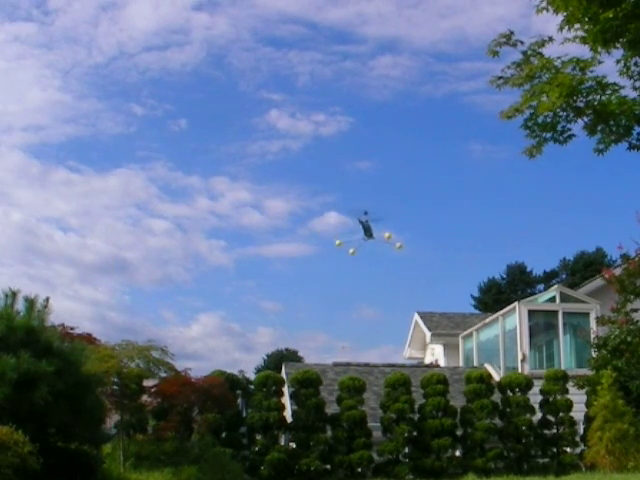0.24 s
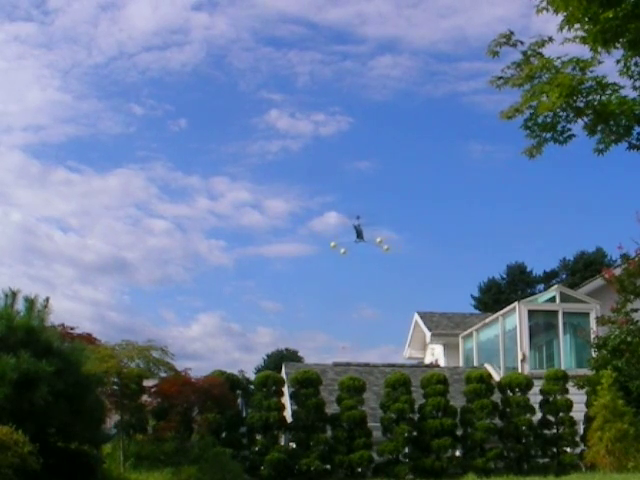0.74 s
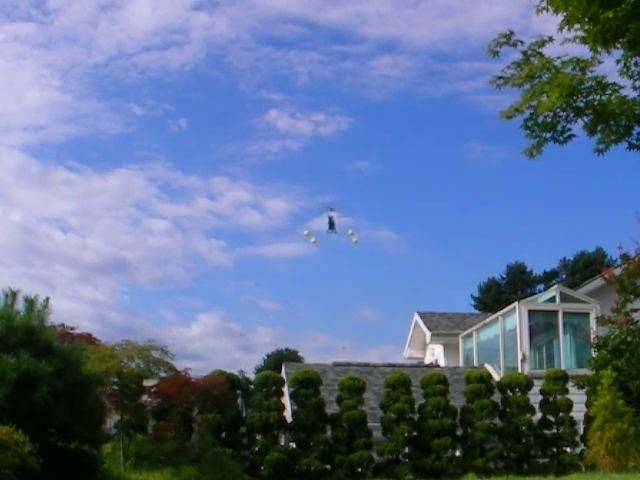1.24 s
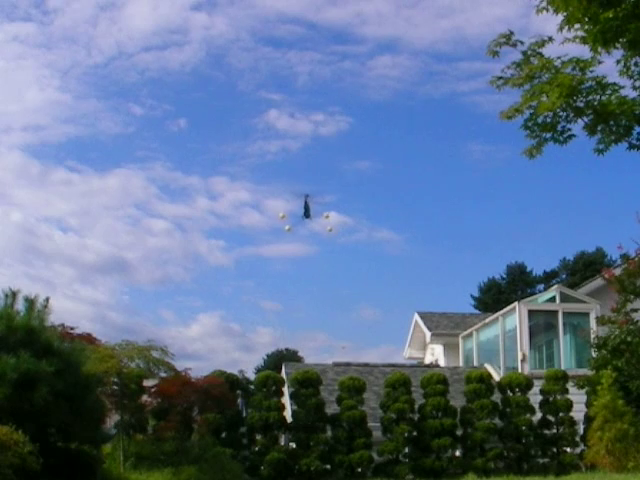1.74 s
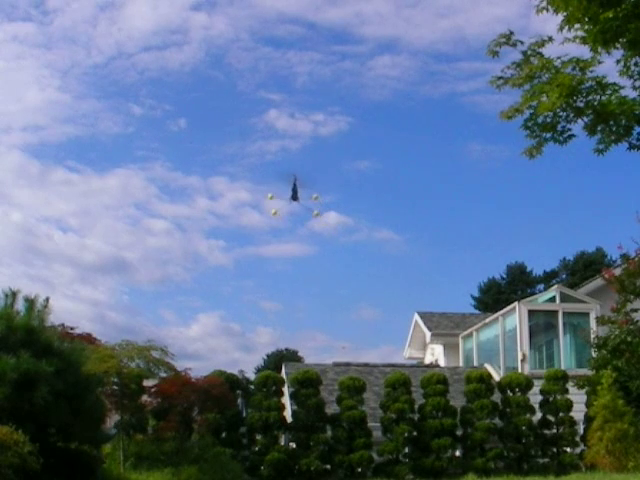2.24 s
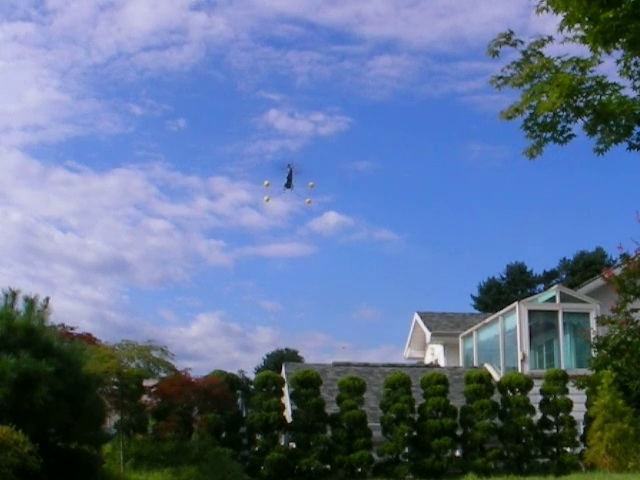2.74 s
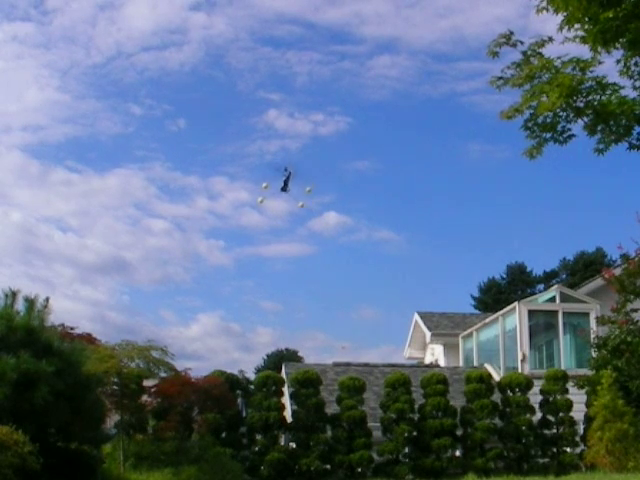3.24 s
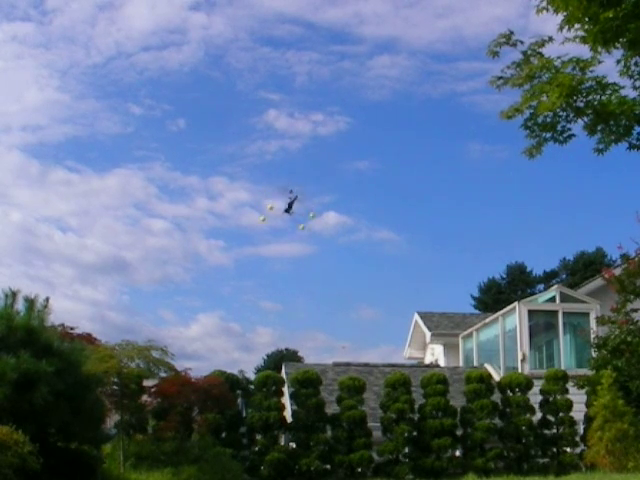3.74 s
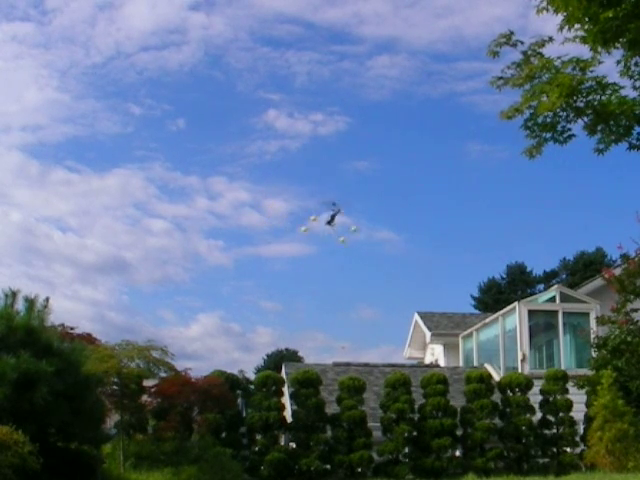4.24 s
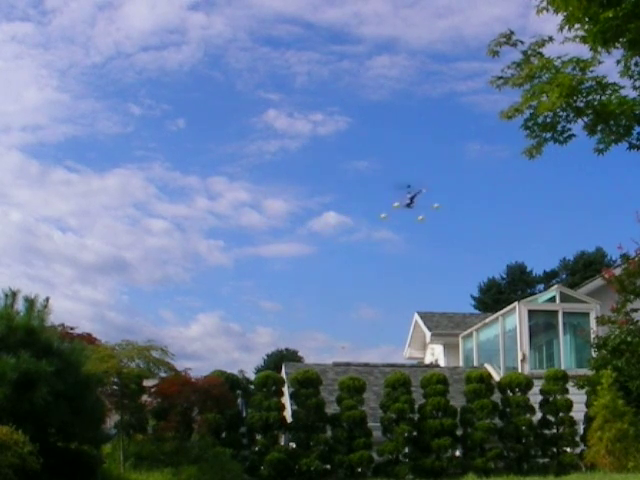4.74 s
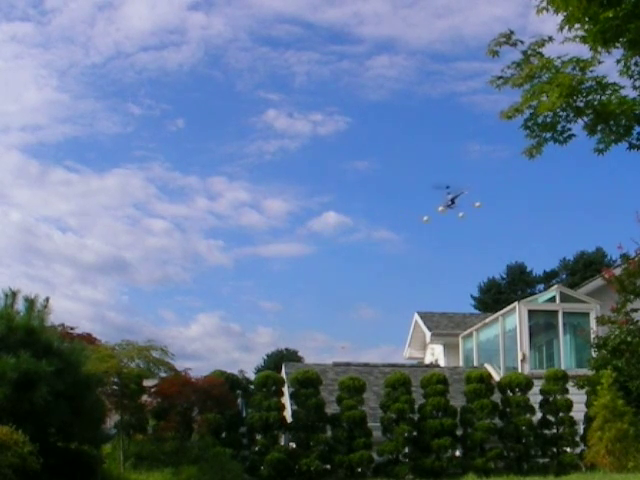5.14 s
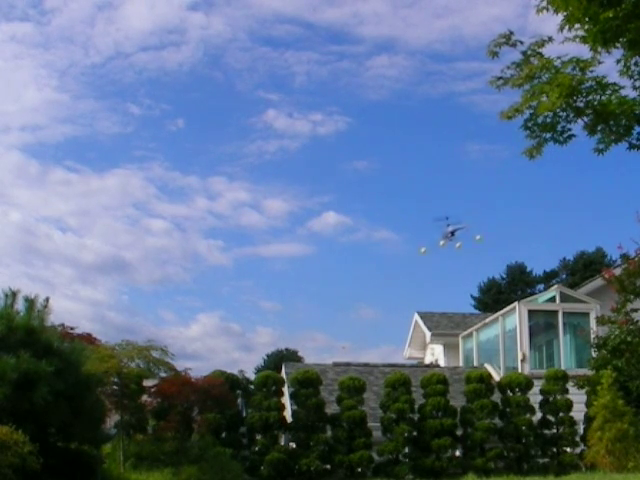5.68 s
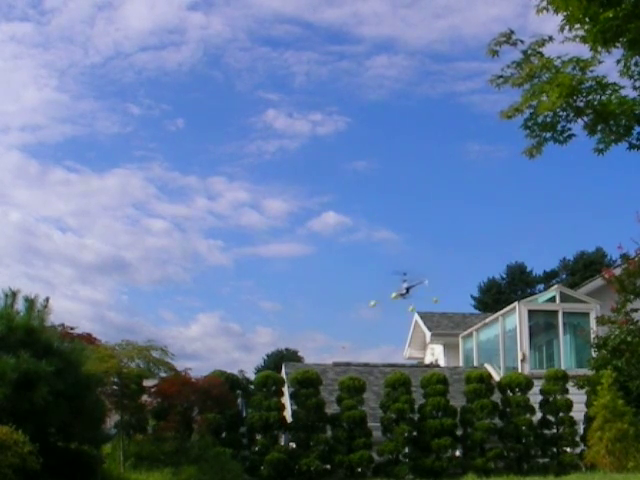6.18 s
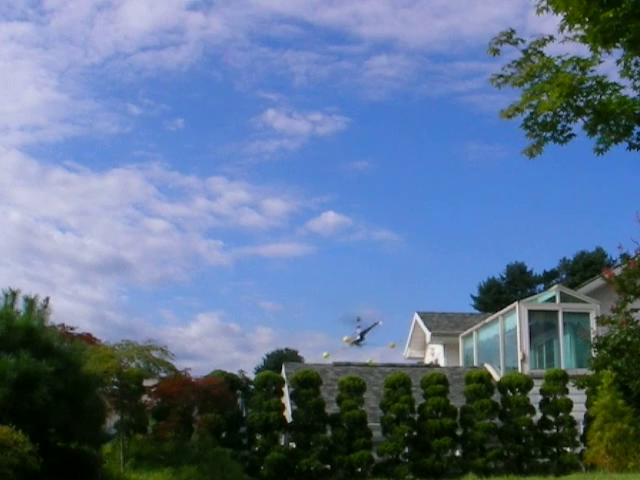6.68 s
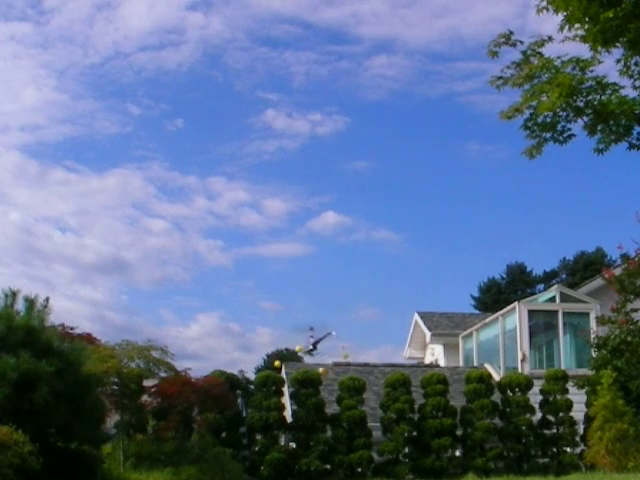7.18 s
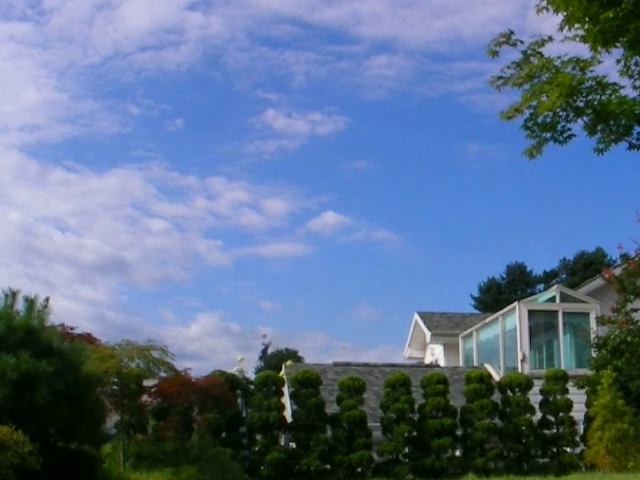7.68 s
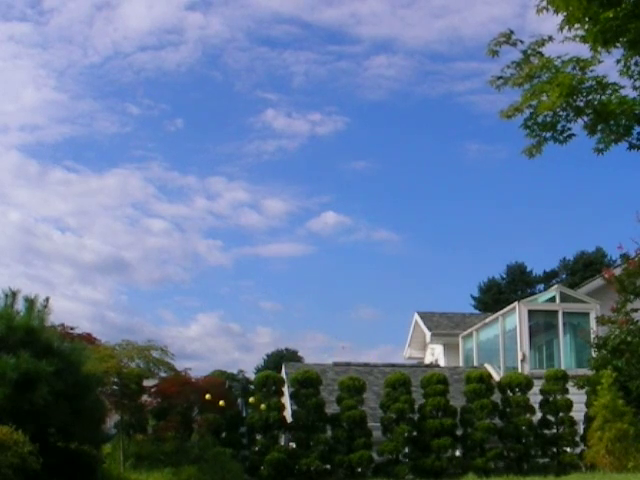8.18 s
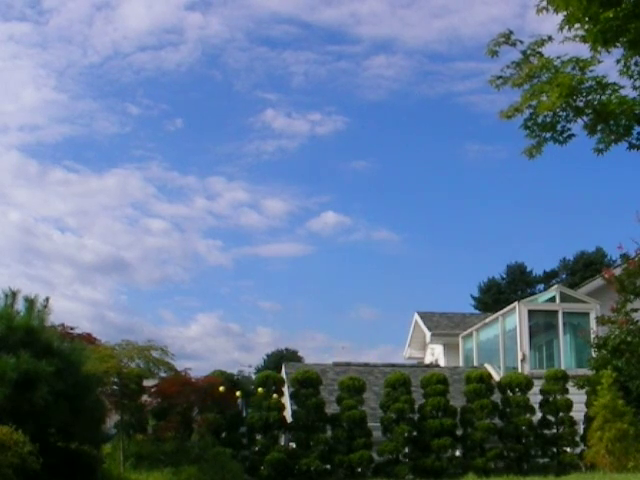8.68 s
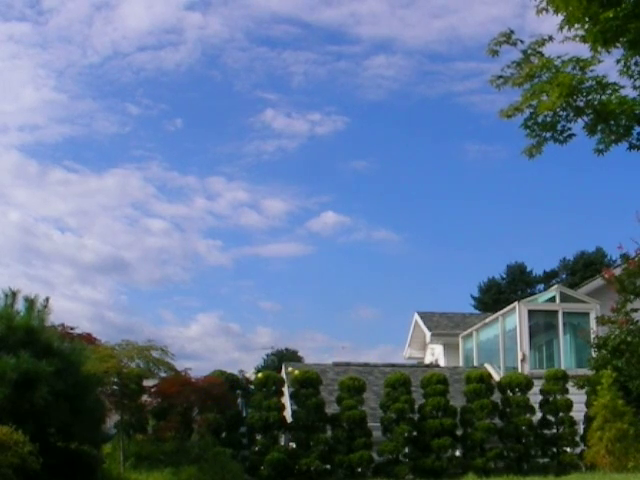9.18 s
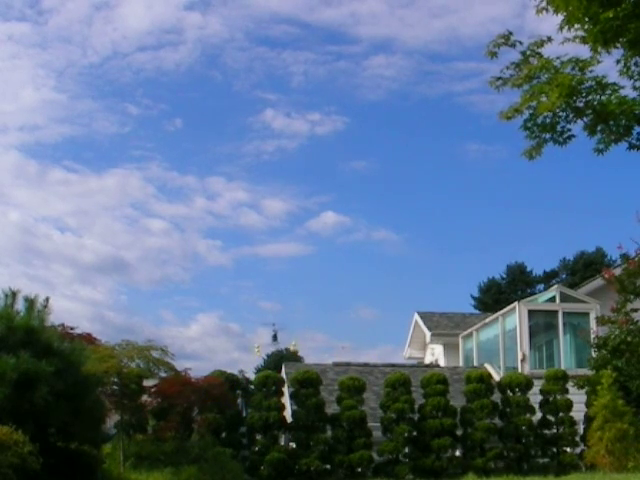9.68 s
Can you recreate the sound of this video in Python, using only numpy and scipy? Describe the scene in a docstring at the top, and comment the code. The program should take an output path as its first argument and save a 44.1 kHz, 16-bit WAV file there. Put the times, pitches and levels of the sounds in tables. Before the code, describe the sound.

Two slightly mismatched geared motors whine above deep rotor hum and hissing air as a toy helicopter hovers, sinks behind a hedge and lifts again.

```python
"""Model helicopter over a garden

A small twin-motor model helicopter hovers over a garden, sinks behind a hedge and lifts again.
Two geared motors whine at slightly different pitches, ring the gear case and turn raspy at high speed.
The blades hum as sine tones; shaped noise makes the churned air, the hiss and the garden's hush.
A thin, fast-pulsing buzz comes and goes high above that hush."""
import sys
import numpy as np
from scipy import signal
from scipy.fft import rfft, irfft
from scipy.io import wavfile
from scipy.ndimage import uniform_filter1d, map_coordinates

SR = 44100
rng = np.random.default_rng(int(sys.argv[2]) if len(sys.argv) > 2 else 0)


def digitize_waveform(pressure):
    """Quantize a signal to 16-bit integers and store it at the path in sys.argv[1].

    Rows of a 2-D input are taken as channels; values are limited to [-1, 1].
    """
    field = np.atleast_2d(pressure).T
    bounded = np.clip(field, -1, 1)
    quanta = np.round(bounded * 32767).astype(np.int16)
    wavfile.write(sys.argv[1], SR, quanta)


N = 437472
TIME = np.arange(N) / SR
BINS = np.fft.rfftfreq(N, 1 / SR)

# Colours of the noise layers; only the shape counts, as each noise is scaled to the same strength.
# quiet garden: (frequency [Hz], relative level [dB])
HUSH_COLOUR = [(100, 5), (400, -21), (900, 11), (1600, -1), (3000, -5), (6500, -17), (9500, -46),
               (13700, -20)]
# deep rumble of the air under the rotors: (frequency [Hz], relative level [dB])
DEEP_COLOUR = [(20, -25), (40, -21), (70, -14.5), (95, -3.5), (125, 1.5), (145, 0), (175, -13.5),
               (300, -35), (700, -89)]
# middle rumble: (frequency [Hz], relative level [dB])
MIDDLE_COLOUR = [(45, -23), (75, -9.5), (130, -16), (160, 1), (210, -0.5), (240, -7), (320, -32.5),
                 (900, -78)]
# hollow top of the rumble: (frequency [Hz], relative level [dB])
HOLLOW_COLOUR = [(60, -52), (180, -18), (230, 0), (285, 0), (308, -9.5), (340, -21), (410, -48), (900, -82)]
# fluttering swish of air: (frequency [Hz], relative level [dB])
SWISH_COLOUR = [(100, -19), (350, 4), (500, 0.5), (750, -1), (1000, -6.5), (1600, -16.5), (3000, -18.5),
                (7000, -24.5), (14000, -61)]
# downwash rushing over the hedge: (frequency [Hz], relative level [dB])
RUSH_COLOUR = [(200, -24), (380, 1), (500, 2), (620, -15), (1000, -26), (3000, -49)]
# broad hiss: (frequency [Hz], relative level [dB])
HISS_COLOUR = [(1500, -24), (3000, -3), (4000, 0), (7000, -6), (8800, -0.5), (9400, 0), (10400, 5.5),
               (11500, 6), (13700, 3.5)]
# narrow sizzle at hovering speed: (frequency [Hz], relative level [dB])
SIZZLE_COLOUR = [(8000, -27), (10200, -22), (10850, -3), (11380, 5.5), (11900, -1), (12400, -17),
                 (13700, -13)]
# thin buzz: (frequency [Hz], relative level [dB])
BUZZ_COLOUR = [(7000, -63), (8800, -4.5), (9800, -14), (11500, -2), (12200, 6.5), (12600, 8), (13100, -14),
               (13700, -3)]
# scraping gears: (frequency [Hz], relative level [dB])
SCRAPE_COLOUR = [(3200, -28), (4300, -0.5), (5200, -1), (5900, -6.5), (6700, -1.5), (7500, -20),
                 (10000, -33)]

# How the layers rise and fall; "relative" levels get a fixed trim in the functions.
# deep rumble: (time [s], relative level [dB])
DEEP_LEVEL = [(0, -22.3), (1.6, -15), (2.45, -23), (2.95, -17.5), (5, -23), (6.35, -33.5), (7, -32.5),
              (9.92, -33.5)]
# middle rumble: (time [s], relative level [dB])
MIDDLE_LEVEL = [(0, -20.5), (.6, -26), (1.1, -21), (2.3, -22), (3.5, -19), (4.3, -23), (5.9, -23.5),
                (6.7, -31.5), (7.1, -21.5), (8.1, -27), (9.1, -35), (9.92, -32)]
# how hard the blades churn the air: (time [s], relative level [dB])
CHURN_LEVEL = [(0, -20.5), (.3, -20.5), (.6, -31), (1.1, -17), (2.2, -22), (3.4, -22), (4.3, -29),
               (6.5, -30), (7.45, -26.5), (9.3, -39.5), (9.92, -28)]
# swish, fading as the craft drifts away: (time [s], relative level [dB])
SWISH_LEVEL = [(0, -32.5), (.55, -38), (1.1, -34.5), (1.7, -37.5), (3.3, -39), (4.8, -44.5), (6.2, -47),
               (7.4, -41.5), (9.2, -51.5), (9.92, -47.5)]
# downwash over the hedge: (time [s], level [dB])
RUSH_LEVEL = [(6.6, -90), (7.15, -41.5), (7.6, -40.5), (8, -47.5), (8.6, -76)]
# treble at hovering speed: (time [s], relative hiss level [dB], relative sizzle level [dB])
TREBLE_LEVEL = [(0, -41, -36), (.9, -54.5, -45.5), (1.7, -43.5, -41), (4.2, -41.5, -39.5),
                (7.2, -41, -38.5), (8.4, -41.3, -43), (9.3, -46, -56), (9.92, -51, -36)]
# thin buzz: (time [s], relative level [dB])
BUZZ_LEVEL = [(0, -33.5), (1.3, -34), (2, -45), (3.6, -53), (4.15, -39), (4.8, -52), (5.9, -44), (7, -35),
              (7.6, -42), (8.15, -42), (8.75, -46), (9.5, -39.5), (9.92, -38)]
# gear scrape that grows as the craft flies low, before the flicker: (time [s], level [dB])
SCRAPE_LEVEL = [(0, -65), (5.7, -53), (6.4, -47.5), (7.1, -43.5), (7.6, -47), (8.3, -46.5), (9.92, -46.5)]
# blade hum: (time [s], relative level [dB])
BLADE_LEVEL = [(0, -30), (0.5, -22), (1.1, -28.5), (1.6, -36), (1.95, -22), (2.6, -27.5), (3.4, -28.5),
               (4, -26), (4.9, -28), (5.5, -38.5), (7.3, -40), (9.92, -48.5)]
# how often a blade passes: (time [s], rate [Hz])
BLADE_RATE = [(0, 59.65), (.7, 59.28), (2, 59.1), (3.3, 57.76), (5.2, 57.05), (7, 54.74), (9.92, 55.39)]

# throttle as gear-mesh pitch; the motors part to steer: (time [s], slow motor [Hz], fast motor [Hz])
THROTTLE = [(0, 2160, 2285), (.6, 2200, 2300), (1.05, 2088, 2265), (1.65, 2113, 2220), (2.5, 2070, 2245),
            (2.85, 2034, 2195), (3.67, 2052, 2197), (3.95, 2279, 2343), (4.51, 2235, 2340),
            (4.69, 2025, 2185), (5.1, 2100, 2193), (5.52, 1972, 2140), (6.05, 2092, 2255),
            (6.33, 2240, 2308), (7.0, 2280, 2489), (7.25, 2060, 2320), (7.5, 1960, 2216),
            (7.72, 1780, 2045), (7.88, 2075, 2252), (8.12, 2245, 2402), (8.55, 2210, 2390),
            (8.92, 2046, 2268), (9.35, 2222, 2370), (9.92, 1954, 2305)]
# how the whine carries as the craft moves and turns:
# (time [s], relative overall level [dB], shift from the octave to the mesh tone [dB])
WHINE_CARRY = [(0, 4, 2.5), (.6, -1, -4), (1.2, -1, 0), (3.3, -2.5, 3.5), (4.2, .5, -0.5), (5.3, -1, 6.5),
               (7.2, 1.5, 5.5), (7.9, 4, 0.5), (8.25, 3, -6), (8.92, 0, 6.5), (9.25, .5, 0),
               (9.92, -0.5, -1.5)]
# how the airframe radiates the higher gear overtones: (frequency [Hz], relative level [dB])
AIRFRAME = [(5300, -56), (5900, -63), (6150, -57.5), (6500, -59), (7200, -66), (9800, -54), (11500, -58),
            (12600, -55), (13400, -60)]
# how far sound differs between left and right: (frequency [Hz], side minus middle [dB])
WIDTH = [(300, -22.5), (600, -19), (1200, -10), (2200, -6), (4500, -8), (8000, -5), (12000, -6)]
# balance of the two sides: (frequency [Hz], left minus right [dB])
BALANCE = [(100, -1.03), (1200, -0.43), (2500, -2.2), (4500, -0.1), (9000, 1), (12500, 0.7)]

HOVER_HZ = 2200  # gear-mesh pitch that counts as hovering speed
GEAR_TEETH, PINION_TEETH = 67, 9
# the gear case rings under the octave of the whine: centre, width, greatest lift
CASE_HZ, CASE_WIDTH_HZ, CASE_DB = 4524, 348, 10
# the slack gears knock as the throttle is cut: middle, half length, least level of the third harmonic
KNOCK_S, KNOCK_LENGTH_S, KNOCK_DB = 7.74, 0.22, -50
EDGE_HZ, NOTCH_HZ = 13700, 7900  # upper limit and narrow gap of the recorder


def amp(db):
    """Turns decibels into a gain."""
    return 10 ** (np.asarray(db) / 20)


def unit(x):
    """Scales a signal to an average strength (rms) of 1."""
    return x / np.sqrt(np.mean(abs(x) ** 2) + 1e-20)


def curves(rows):
    """Joins the points of each table column by straight lines, one value per sample."""
    s, *columns = np.transpose(rows)
    return [np.interp(TIME, s, c) for c in columns]


def glides(rows):
    """Rounds each table column into a curve: spinning parts cannot change speed with a jerk."""
    s, *columns = np.transpose(rows)
    place = np.interp(TIME, s, np.arange(len(s)))
    return [map_coordinates(c, [place], order=3, mode="nearest") for c in columns]


def read(points, at_hz=BINS):
    """Reads a frequency table at every bin or along a pitch curve."""
    hz, value = np.transpose(points)
    return np.interp(np.log(at_hz + 1), np.log(hz + 1), value)


def wander(rate_hz):
    """Smooth random drift of rms 1, up to about the given rate."""
    return unit(irfft(rfft(rng.standard_normal(N)) / (1 + (BINS / rate_hz) ** 4), N))


def halo(width_hz):
    """Random complex swell that spreads a tone into a narrow band."""
    return unit(wander(width_hz) + 1j * wander(width_hz))


def ports(common, scattered):
    """Direct sound reaches both microphones alike; scattered sound makes them differ in the treble."""
    side = irfft(rfft(scattered) * amp(read(WIDTH)), N)
    return np.array([common + side, common - side])


def noise(colour):
    """Stereo noise of the given colour, its two parts scaled together to rms 1."""
    white = rng.standard_normal((2, N))
    coloured = irfft(rfft(white) * amp(read(colour)), N)
    return ports(*unit(coloured))


def eddies(x, depth_db, count=512):
    """Eddies lift and sink patches some tens of Hz wide and a few tenths of a second long."""
    pieces = signal.stft(x, nperseg=count * 8)[2]
    patches = rng.standard_normal(pieces.shape[1:])
    patches = uniform_filter1d(patches, size=3, axis=0)  # across frequency
    patches = unit(uniform_filter1d(patches, size=5, axis=1))  # across time
    return unit(signal.istft(pieces * amp(depth_db * patches))[1][:, :N])


def shifted(x, by_hz):
    """Slides a whole band of noise up or down along a curve."""
    return (signal.hilbert(x) * np.exp(2j * np.pi * np.cumsum(by_hz) / SR)).real


def revs(hz):
    """Motor speed in per cent above hovering speed."""
    return 100 * (hz / HOVER_HZ - 1)


def hush(level_db=-50.5):
    """The quiet garden is a faint, steady, coloured noise."""
    return amp(level_db) * noise(HUSH_COLOUR)


def wash(deep_db=-1.5, middle_db=0.5, hollow_db=0., swish_db=1.5, flutter_db=1.95):
    """Turbulent air under the rotors: a lumpy rumble, a fluttering swish and a rush over the hedge."""
    (low_db,), (mid_db,), (churn_db,) = curves(DEEP_LEVEL), curves(MIDDLE_LEVEL), curves(CHURN_LEVEL)
    deep = amp(low_db + deep_db) * eddies(noise(DEEP_COLOUR), depth_db=0.5)
    middle = amp(mid_db + middle_db) * eddies(noise(MIDDLE_COLOUR), depth_db=2.5)

    # reading the hollow noise at blade speed makes its pitch sink as the rotors slow
    speed = curves(BLADE_RATE)[0]
    clock = np.cumsum(speed / speed.mean()) / SR
    even_hollow = eddies(noise(HOLLOW_COLOUR), depth_db=2.5)
    hollow = np.array([np.interp(clock, TIME, x) for x in even_hollow])
    hollow = amp(churn_db + hollow_db) * hollow

    flutter = flutter_db * wander(39)
    swish_gain = amp(curves(SWISH_LEVEL)[0] + swish_db + flutter)
    swish = swish_gain * eddies(noise(SWISH_COLOUR), depth_db=2.06)
    rush = amp(curves(RUSH_LEVEL)[0]) * noise(RUSH_COLOUR)
    return deep + middle + hollow + swish + rush


def gust(at_s=1.045, length_s=0.16, level_db=-34):
    """The blades bite into disturbed air: one brief, rough, brighter swell."""
    colour = [(400, -10), (780, 6.5), (1500, -13), (4500, -31)]  # (frequency [Hz], relative level [dB])
    swell = np.exp(-((TIME - at_s) / length_s) ** 2)
    return amp(level_db + 3.5 * wander(60)) * swell * noise(colour)


def whistle(at_s=7.5, length_s=0.18, hz=1475, width_hz=14, level_db=-53):
    """A faint whistle, a tone blurred into a narrow band, as the craft sinks past the hedge."""
    swell = np.exp(-((TIME - at_s) / length_s) ** 2)
    fuzzy_tone = np.sqrt(2) * (halo(width_hz) * np.exp(2j * np.pi * hz * TIME)).real
    return amp(level_db) * swell * fuzzy_tone


def treble(hiss_db=4.5, sizzle_db=-1.5, buzz_db=-1.5, hiss_db_per_percent=0.37,
           sizzle_db_per_percent=1.1, sizzle_hz_per_percent=45, pulse_hz=54, depth=0.39, flicker_db=1.5):
    """Hiss and sizzle follow the throttle, the gears scrape, and a buzz pulses at its own rate."""
    (broad_db, narrow_db), (thin_db,) = curves(TREBLE_LEVEL), curves(BUZZ_LEVEL)
    speed = revs(curves(THROTTLE)[0])
    hiss = amp(broad_db + hiss_db + hiss_db_per_percent * speed) * noise(HISS_COLOUR)
    sizzle = shifted(noise(SIZZLE_COLOUR), sizzle_hz_per_percent * speed)
    sizzle = amp(narrow_db + sizzle_db + sizzle_db_per_percent * speed) * sizzle

    pulse_rate = pulse_hz * (1 + .01 * wander(3))
    pulses = 1 + depth * np.sin(2 * np.pi * np.cumsum(pulse_rate) / SR)
    buzz = amp(thin_db + buzz_db) * pulses * noise(BUZZ_COLOUR)

    scrape = amp(curves(SCRAPE_LEVEL)[0]) * noise(SCRAPE_COLOUR)
    flicker = amp(flicker_db * wander(144) + .5 * wander(11.0))
    return (hiss + sizzle + buzz + scrape) * flicker


def blades(hum_db=-0.5, octave_db=-1.5):
    """Each passing blade pushes the air: a hum with a wavering octave."""
    (hz,), (db,) = curves(BLADE_RATE), curves(BLADE_LEVEL)
    phase = 2 * np.pi * np.cumsum(hz) / SR
    hum = amp(hum_db) * np.sin(phase)
    octave = amp(octave_db + 5.8 * wander(3.85)) * np.sin(2 * phase + 0.58 * wander(5.2))
    return np.sqrt(2) * amp(db) * (hum + octave)


def case_ring(hz):
    """Lift in dB of a tone that passes through the gear case's resonance."""
    return CASE_DB / (1 + (2 * (hz - CASE_HZ) / CASE_WIDTH_HZ) ** 2)


def motor(hz, mesh_carry_db, octave_carry_db, mesh_db, mesh_db_per_percent, octave_db,
          octave_db_per_percent, overtones_db, rough, octave_rough, rasp_hz, jitter, wobble, chatter,
          rattle_hz, skirt_db, skirt_hz):
    """Gear teeth mesh in a whine; wheel and pinion run out of true and turn raspy at high speed."""
    rasp = 1 / (1 + np.exp((rasp_hz - hz) / 45))  # 0 to 1, sets in around a critical speed
    phase = 2 * np.pi * np.cumsum(hz * (1 + jitter * wander(23.3))) / SR

    # each turn of wheel and pinion pushes the teeth ahead and back: close and wide sidebands
    wheel = wobble * np.sin(phase / GEAR_TEETH + 1.3 * wander(18))
    pinion = chatter * (0.52 + rasp) * np.sin(phase / PINION_TEETH + 0.73 * wander(21))
    mesh = np.exp(1j * (phase + wheel + pinion))

    # level and rough share of each harmonic
    first_db = mesh_carry_db + mesh_db + mesh_db_per_percent * revs(hz)
    second_db = octave_carry_db + octave_db + octave_db_per_percent * revs(hz) + case_ring(2 * hz)
    knock_db = KNOCK_DB - 10 * ((TIME - KNOCK_S) / KNOCK_LENGTH_S) ** 2
    third_db = np.maximum(read(AIRFRAME, 3 * hz) + overtones_db, knock_db)
    harmonics = [(first_db, rough), (second_db, octave_rough), (third_db, octave_rough)]
    harmonics += [(read(AIRFRAME, k * hz) + overtones_db, octave_rough) for k in range(4, 7)]

    direct, scattered = np.zeros((2, N))
    fading, echo = amp(2.0 * wander(8.3)), halo(8.9)
    rattle, skirt = halo(rattle_hz), halo(skirt_hz)
    skirt = skirt * np.exp(-2j * np.pi * 70 * TIME)  # the wide fringe hangs 70 Hz below each tone
    for k, (db, share) in enumerate(harmonics, 1):
        share = np.clip(share + 0.21 * rasp, 0, .95)
        tone = amp(db) * mesh ** k * np.sqrt(2)
        clean = np.sqrt(1 - share)
        fuzz = np.sqrt(share) * rattle
        fringe = amp(skirt_db) * (.5 + rasp) * np.sqrt(k / 2) * skirt
        # moving the random curves on by one second lets each harmonic waver in its own way
        rattle, skirt, fading, echo = (np.roll(x, SR) for x in (rattle, skirt, fading, echo))
        direct += (tone * (clean * fading + fuzz + fringe)).real
        scattered += (tone * (clean + fuzz - fringe) * echo).real
    return ports(direct, scattered)


def scene():
    """Mixes the quiet garden, the churned air, the treble, the blades and both motors."""
    (slow_hz, fast_hz), (carry_db, turn_db) = glides(THROTTLE), curves(WHINE_CARRY)
    slow = motor(slow_hz, carry_db + turn_db, carry_db - 0.31 * turn_db,
                 mesh_db=-52.0, mesh_db_per_percent=0.4, octave_db=-52.5, octave_db_per_percent=.55,
                 overtones_db=-3, rough=0.23, octave_rough=0.22, rasp_hz=2286, jitter=0.00203,
                 wobble=0.17, chatter=0.27, rattle_hz=79.4, skirt_db=-5.5, skirt_hz=170)
    fast = motor(fast_hz, carry_db + 0.31 * turn_db, carry_db,
                 mesh_db=-58.0, mesh_db_per_percent=0.37, octave_db=-49, octave_db_per_percent=-0.13,
                 overtones_db=-2, rough=0.56, octave_rough=0.46, rasp_hz=2415, jitter=0.002003,
                 wobble=0.33, chatter=0.24, rattle_hz=93, skirt_db=-2.5, skirt_hz=195)
    return hush() + wash() + gust() + whistle() + treble() + blades() + slow + fast


def record(dry):
    """A stereo recorder with a left-right balance, a narrow treble notch and an upper limit."""
    notch = 1 / (1 + (340 / (abs(BINS - NOTCH_HZ) + 1)) ** 6)
    edge = 1 / np.sqrt(1 + (BINS / EDGE_HZ) ** 400)
    sides = amp(np.array([[.5], [-.5]]) * read(BALANCE))  # half the difference to each side
    return irfft(rfft(dry) * sides * notch * edge, N)


dry = scene()
out = record(dry)
digitize_waveform(out)
```